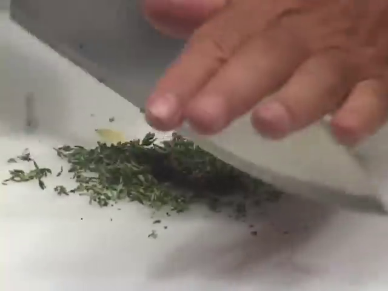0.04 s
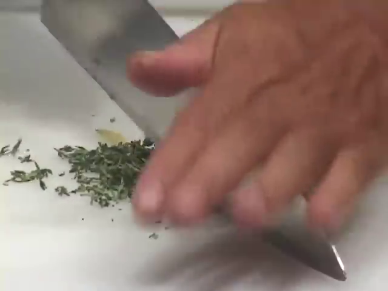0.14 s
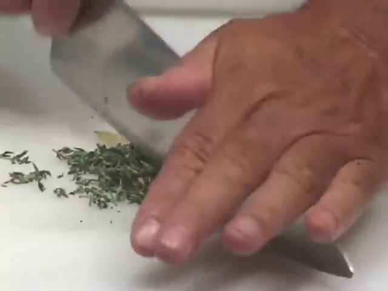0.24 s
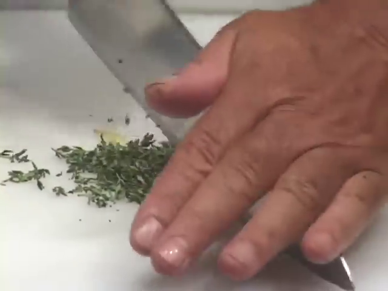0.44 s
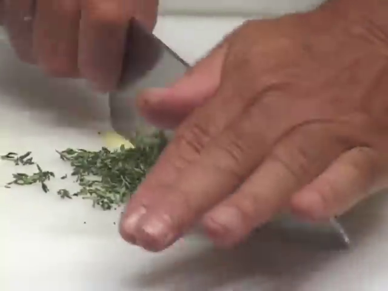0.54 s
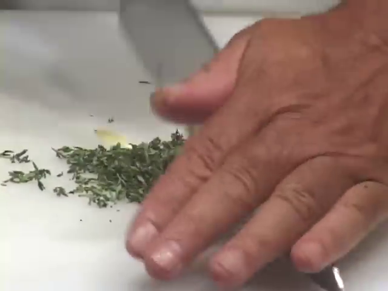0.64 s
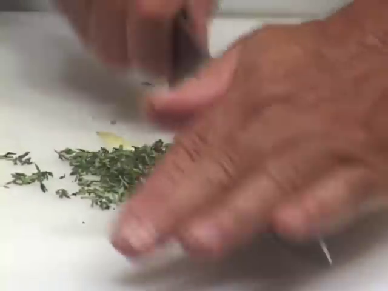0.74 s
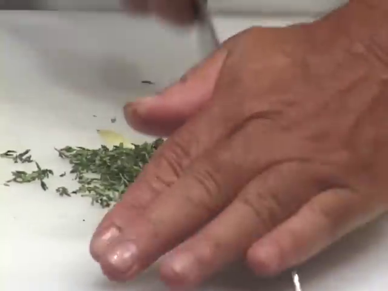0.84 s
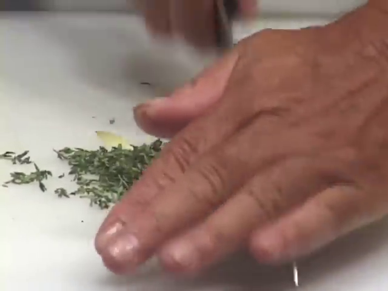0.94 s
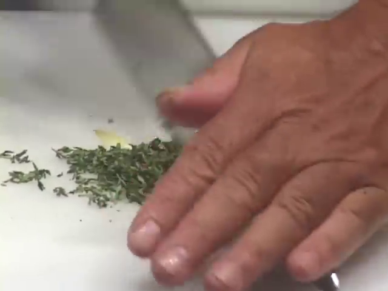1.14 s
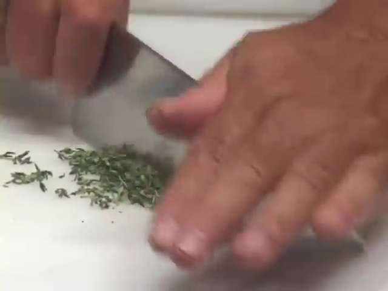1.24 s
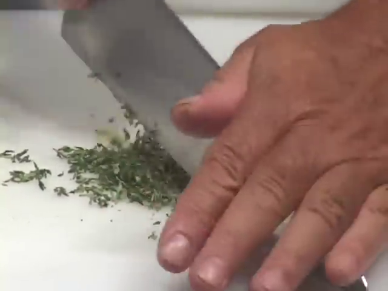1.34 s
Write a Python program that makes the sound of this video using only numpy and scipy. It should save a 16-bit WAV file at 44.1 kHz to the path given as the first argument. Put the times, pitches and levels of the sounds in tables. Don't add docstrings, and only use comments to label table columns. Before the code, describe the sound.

A knife chops herbs on a plastic board. A dull knock fades under a light scrape, then the blade cracks sharply on bare board at 0.22 s, loudest of all. A soft pat at 0.39, clicky ticks around 0.6 and 0.85, a hollow thud at 1.06, gritty drags to 1.2, a last chop at 1.3. Hard-walled kitchen echo, soft hum; bright distant left, muffled close right.

```python
import sys
import numpy as np
from scipy import signal
from scipy.fft import rfft, irfft
from scipy.io import wavfile

SR = 44100
rng = np.random.default_rng(int(sys.argv[2]) if len(sys.argv) > 2 else 0)


def master_out(mix):
    frames = np.transpose(np.atleast_2d(mix))
    ceiling = np.clip(frames, -1, 1)
    pcm = np.round(ceiling * 32767).astype(np.int16)
    wavfile.write(sys.argv[1], SR, pcm)


def field_ratio(decibels):
    return 10 ** (np.asarray(decibels, dtype=float) / 20)


N = 61739
LEAD_S = .15

# start_s (close microphone), level_db, contact_ms, lag_ms (to the far microphone)
KNOCKS = [
    (-.03, -26, 0.82, 5.55),
    (0.2244, -1.5, 0.22, 5.6),
]


def clock():
    return np.arange(N + int(LEAD_S * SR)) / SR - LEAD_S


def ring(x, hz, t60):
    decay = np.log(1000) / (t60 * SR)
    return signal.lfilter([1], [1, -np.exp(2j * np.pi * hz / SR - decay)], x).imag


def octave(x, hz, span=1):
    f = np.arange(len(x) // 2 + 1) * SR / len(x) + 1
    distance = np.clip(np.log2(f / hz) / span, -1, 1)
    return irfft(rfft(x) * np.cos(np.pi / 2 * distance) ** 2, len(x))


def band(x, lo_hz, hi_hz, order=6):
    x = signal.sosfilt(signal.butter(3, lo_hz, "high", fs=SR, output="sos"), x)
    return signal.sosfilt(signal.butter(order, hi_hz, fs=SR, output="sos"), x)


def hush(spectrum):
    hz, db = np.array(spectrum).T
    f = np.arange(N // 2 + 1) * SR / N + 1
    shape = field_ratio(np.interp(np.log(f), np.log(hz), db)) * np.sqrt(SR / 2)
    noise = irfft(rfft(rng.standard_normal(N)) * shape, N)
    out = np.zeros(N)
    for center_hz in 26.0 * 2. ** np.arange(10):
        flicker_db = np.interp(np.arange(N), np.arange(0, N + 3000, 3000), rng.standard_normal(N // 3000 + 2))
        out += octave(noise, center_hz) * field_ratio(flicker_db)
    return out


def background():
    # pitch_hz, level_db (per Hz)
    far_noise = [(50, -130), (110, -112), (200, -94), (350, -87.5), (800, -95), (2000, -104), (5000, -113),
                 (9500, -130)]
    close_noise = [(30, -124), (110, -105), (250, -101), (600, -104), (1000, -110), (2000, -122),
                   (4000, -128), (12000, -136)]
    return np.array([hush(far_noise), hush(close_noise)])


def kitchen(fades, early_db, early_t60, late_db, flutter_db, trip_db, build_s, echo_s, echo_db):
    t = np.arange(SR // 2) / SR
    hz, t60 = np.array(fades).T
    noise = rng.standard_normal((2, len(t)))
    late = np.zeros(len(t))
    for center_hz in 88.4 * 2 ** (np.arange(16) / 2):
        fade_s = np.interp(np.log(center_hz), np.log(hz), t60)
        late += octave(noise[0], center_hz, .5) * field_ratio(-60 * t / fade_s)
    early = field_ratio(early_db - 60 * t / early_t60) * noise[1]
    tail = (field_ratio(late_db) * late + early) * np.clip(t / build_s, 0, 1)
    trips, trip_s = np.arange(1, 12), .0167
    flutter = np.zeros(len(t))
    flutter[(trips * trip_s * SR).astype(int)] = field_ratio(flutter_db + trip_db * (trips - 1.5))
    flutter[int(echo_s * SR)] = field_ratio(echo_db)
    return tail + signal.sosfilt(signal.butter(2, 693, "high", fs=SR, output="sos"), flutter)


def far_kitchen():
    # pitch_hz, fade_s (by 60 dB)
    far_fades = [(200, 0.92), (450, 0.23), (800, 0.49), (1300, 0.41), (2000, 0.44), (3500, 0.43),
                 (6000, 0.2), (12000, 0.065)]
    return kitchen(far_fades, early_db=-29, early_t60=0.07, late_db=-25.5, flutter_db=-14.5, trip_db=-2.5,
                   build_s=.007, echo_s=.0056, echo_db=-10.5)


def close_kitchen():
    # pitch_hz, fade_s (by 60 dB)
    close_fades = [(200, .25), (450, .2), (800, .28), (1300, .45), (2000, .33), (3500, .22), (6000, .2)]
    return kitchen(close_fades, early_db=-26, early_t60=0.1356, late_db=-28, flutter_db=-7, trip_db=-6.5,
                   build_s=0.27, echo_s=.0078, echo_db=-14)


def board(blows, tones, alternate=True):
    t, out = clock(), []
    for mic in (0, 1):
        push = 0
        for s, db, contact_ms, lag_ms in blows:
            arrival_s = s + (1 - mic) * lag_ms / 1000
            u = np.clip((t - arrival_s) / (contact_ms / 1000), 0, 1)
            push = push + field_ratio(db) * np.sin(np.pi * u) ** 2 * 2000 / (contact_ms * SR)
        sound = 0
        for k, tone in enumerate(tones):
            flip = (-1) ** (k * alternate)
            sound = sound + flip * field_ratio(tone[2 + mic]) * ring(push, tone[0], tone[1])
        out.append(sound)
    return np.array(out)


def low_thump():
    # pitch_hz, fade_s (by 60 dB), far_db, close_db
    thump_tones = [(45, .12, -27, -1.5), (89, 0.18, -16, 1.5), (160.7, 0.26, -3, 7.5)]
    # start_s, level_db, contact_ms, lag_ms
    shakes = [
        (.2246, -62, 1.4, 4.4),
        (.39, -64, 1.1, 3.1),
        (1.062, -68, 1.8, 4.6),
        (1.305, -70, 4, 5.4),
    ]
    return board(shakes, thump_tones)


def soft_pats():
    # pitch_hz, fade_s (by 60 dB), far_db, close_db
    pat_tones = [(312, 0.044, 0, 5), (485, 0.02, 5.5, 6), (730, 0.0085, 5, 10.5), (962, 0.019, 3, 2.5),
                 (1530, 0.0083, 7.5, -0.5)]
    # start_s, level_db, contact_ms, lag_ms
    pats = [(-.02, -45, 1, 7), (.004, -67, 0.59, 8.1), (.393, -44.5, 0.88, 5.54), (.603, -68, 1, 8.4),
            (.611, -56.5, 0.14, 6.4), (.628, -56.5, 0.47, 4.1), (.826, -61.5, 0.64, 6.5),
            (.838, -58.5, 0.38, 5.6), (.848, -57.5, 0.16, 6.2), (.858, -91, 0.24, 4.5), (.92, -64, 1, 7.6),
            (1.048, -57.5, 0.25, 6.9), (1.305, -47, 0.66, 7.24), (1.345, -50, 0.88, 6.1),
            (1.385, -59.5, 0.77, 4.6)]
    return board(pats, pat_tones)


def heel_thud():
    # pitch_hz, fade_s (by 60 dB), far_db, close_db
    thud_tones = [(350, 0.039, -33.5, -59), (416, 0.027, -29.5, -55), (495, 0.05, -24, -17.5),
                  (579, 0.028, -37, -32), (1040, 0.014, -26.5, -31.5), (1227, 0.044, -37.5, -78),
                  (1556, 0.012, -23.5, -30), (1740, 0.013, -64, -67), (2900, .02, -69, -47)]
    # start_s, level_db, contact_ms, lag_ms
    thuds = [
        (1.0605, 0.84, 0.68, 7),
    ]
    return board(thuds, thud_tones)


def sharp_knock():
    # pitch_hz, fade_s (by 60 dB), far_db, close_db
    knock_tones = [(370, 0.044, -23.5, -44), (590, 0.082, -41.5, -23), (845, 0.019, -29, -10),
                   (1160, 0.0083, -9, -13), (1507, 0.0074, -9, -9.5), (1708, 0.0098, -19, -14),
                   (2490, 0.0094, -50, -29.5), (3360, 0.0037, -26.5, -8), (4150, 0.0079, -31, -27),
                   (4870, .008, -39, -40)]
    far, close = board(KNOCKS, knock_tones, alternate=False)
    return np.array([band(far, 608, 12000), -band(close, 306, 12000)])


def knock_crack():
    t = clock()
    out = np.zeros((2, len(t)))
    for s, db, _, lag_ms in KNOCKS:
        at = np.searchsorted(t, [s + lag_ms / 1000, s]) + 20
        out[[0, 1], at] += field_ratio(db + np.array([-31.5, -44]))
    return out


def grit_spray(fade_s, u):
    clicks_per_s, scatter_db, power = 2200, 4, 1290
    draw = rng.random((2, len(u)))
    hits = (draw[0] < clicks_per_s / SR) * np.sign(draw[1] - .5)
    grit = hits * field_ratio(scatter_db * rng.standard_normal(len(u)))
    spray = grit * np.exp(-u / fade_s) * (1 - np.exp(-u / (0.048 * fade_s)))
    strike = np.exp(-fade_s / 0.0067)
    spray = spray * (1 - strike) * np.sqrt(power * fade_s / (np.sum(spray ** 2) + 1e-9))
    spray[0] = strike
    return spray


def blade():
    # pitch_hz, fade_s (by 60 dB), level_db
    body_tones = [(1054, 0.012, 5.5), (1470, .035, 2.5), (1790, 0.032, 5), (2200, 0.014, -4),
                  (2450, 0.022, -3), (2954, 0.015, -4), (3414, 0.0094, -6.5), (3620, 0.01, -3),
                  (4230, 0.014, -3.5), (4600, 0.0088, -9), (4930, 0.017, -9.5), (5770, 0.0096, -15),
                  (6060, 0.011, -2.5), (6360, 0.02, -13)]
    edge_tones = [(7910, 0.05, -20.5), (9860, .02, -11), (11380, 0.017, -2), (11000, 0.0069, -11.5),
                  (12200, 0.016, -16), (13700, .012, -26)]
    # start_s (far microphone), fade_s, level_db, pitch_hz (strongest), edge_db (ring of the edge)
    ticks = [(0.2284, 0.00051, -29, 2510, -63), (.2302, 0.0041, -27, 4600, -61),
             (.608, 0.0049, -47.5, 3600, -82), (.6152, 0.0037, -36.5, 3800, -57),
             (0.615, 0.0038, -59, 5860, -84), (.624, 0.0026, -43, 4230, -75),
             (0.6325, 0.0021, -36, 4030, -54), (.649, 0.0046, -46, 4230, -80),
             (.677, .003, -50.5, 4230, -85), (.630, 0.0042, -46.5, 6160, -67),
             (.632, 0.004, -44.5, 2450, -102), (0.845, 0.0076, -52, 2200, -68),
             (.846, 0.006, -47, 3040, -78), (.858, 0.0056, -48, 3600, -75), (.855, 0.0034, -61, 5000, -78),
             (0.864, 0.0037, -46.5, 1470, -88), (.904, .002, -53, 1470, -69), (.919, 0.003, -58, 1470, -94),
             (0.936, 0.007, -86, 3000, -66.5), (.9985, 0.0027, -54.5, 4240, -49.5),
             (.999, 0.0016, -56.5, 6200, -69), (.999, 0.0023, -55, 2900, -80),
             (1.017, 0.003, -81, 4500, -60), (1.054, 0.0069, -53, 3620, -67),
             (1.0605, 0.0061, -38.5, 3550, -60), (1.061, 0.0045, -43, 4930, -74),
             (1.066, .003, -40.5, 2870, -80), (1.115, 0.0088, -38, 1100, -79.5),
             (1.159, 0.0026, -52, 3000, -74), (1.167, .003, -50, 4300, -58), (1.19, 0.0057, -48, 2280, -76),
             (1.195, 0.0038, -54, 4700, -78), (1.294, 0.0058, -61, 3400, -66),
             (1.302, 0.0079, -46, 3460, -59), (1.309, 0.0013, -37.5, 2450, -57),
             (1.312, .003, -36.5, 3840, -57), (1.310, 0.0033, -38, 4300, -64),
             (1.33, 0.0045, -47.5, 3740, -65), (1.312, 0.0026, -47, 1790, -90),
             (1.378, 0.0047, -53, 1470, -90)]
    drags = [(-.02, 0.042, -61, 3760, -77.5), (-.02, 0.039, -59.5, 2200, -83),
             (-.01, 0.046, -64.5, 5700, -84.5), (0.241, 0.054, -57.5, 4760, -76.5),
             (0.385, 0.011, -51, 4720, -63), (.636, 0.015, -54, 3970, -75), (.636, 0.018, -56, 2450, -90),
             (.662, 0.0074, -57, 3800, -90), (0.84, 0.024, -55, 4960, -71), (.846, 0.011, -51.5, 3180, -79),
             (0.865, 0.011, -64, 2900, -89.5), (1.074, 0.033, -50.5, 3320, -78.5),
             (1.134, 0.033, -50.5, 2900, -75), (1.143, 0.046, -53, 4870, -86),
             (1.145, 0.06, -51.5, 1230, -97), (1.165, 0.027, -49.5, 2280, -71),
             (1.178, 0.03, -50.5, 2740, -85), (1.327, 0.018, -55.5, 3450, -78)]
    focus_octaves, grip_db, grip_detune = .24, 1.5, .012
    t = clock()
    body, edge = np.zeros((2, len(t) + SR))
    u = np.arange(SR // 5) / SR
    for s, fade_s, db, pitch_hz, edge_db in ticks + drags:
        spray = grit_spray(fade_s, u)
        grip = rng.standard_normal((2, 32))
        around = pitch_hz * field_ratio(np.array([-3, 3]))
        soft = signal.sosfilt(signal.butter(2, around, "band", fs=SR, output="sos"), spray)
        first = np.searchsorted(t, s)
        at = slice(first, first + len(u))
        for k, (hz, t60, tone_db) in enumerate(body_tones):
            focus = np.exp(-(np.log2(hz / pitch_hz) / focus_octaves) ** 2)
            level = focus * field_ratio(db + tone_db + grip_db * grip[0, k])
            body[at] += level * ring(soft, hz * (1 + grip_detune * grip[1, k]), t60)
        for k, (hz, t60, tone_db) in enumerate(edge_tones):
            edge[at] += field_ratio(edge_db + tone_db + grip_db * grip[0, -k - 1]) * ring(spray, hz, t60)
    return body[:len(t)], edge[:len(t)]


def echoed(x, response):
    return signal.fftconvolve(x, response)[:len(x)]


def far_microphone(hits, body, edge):
    hits = band(hits, 340, 7200)
    into_room = hits + field_ratio(-12) * body + field_ratio(-10.5) * edge
    return hits + body + edge + echoed(into_room, far_kitchen())


def close_microphone(hits, body, far_body):
    blade_lead_s = .004
    muffled = band(body, 20, 1600) + .02 * far_body
    steel = field_ratio(-24) * np.roll(muffled, -int(blade_lead_s * SR))
    sound = band(hits + steel, 330, 4400)
    sound = field_ratio(-24) * sound + band(sound, 30, 2000)
    into_room = sound - .8 * band(sound, 8.8, 800, order=1)
    return sound + echoed(into_room, close_kitchen())


def scene():
    air = background()
    far_hits, close_hits = heel_thud() + soft_pats() + sharp_knock()
    body, edge = blade()
    far_body = band(body, 340, 7200)
    far = far_microphone(far_hits, far_body, edge)
    close = close_microphone(close_hits, body, far_body)
    out = np.array([far, close]) + low_thump() + knock_crack()
    return out[:, int(LEAD_S * SR):] + air


def roll_off(x):
    return signal.sosfilt(signal.butter(12, 14440, fs=SR, output="sos"), x)


def record(dry):
    mix = signal.sosfilt(signal.ellip(8, .2, 60, 14200, fs=SR, output="sos"), dry)
    return roll_off(mix)


dry = scene()
out = record(dry)
master_out(out)
```